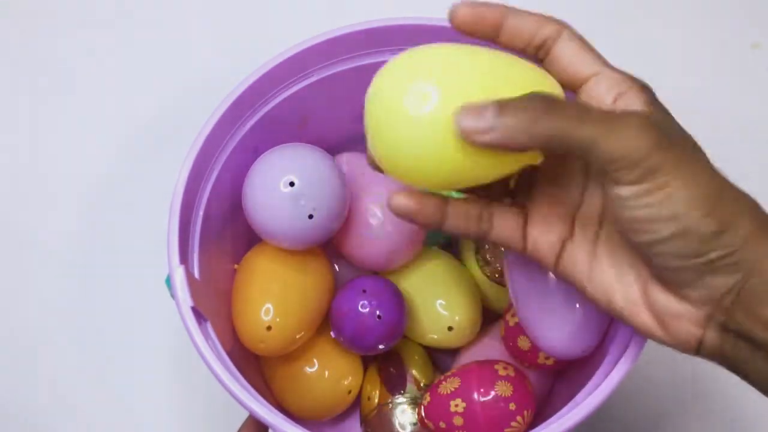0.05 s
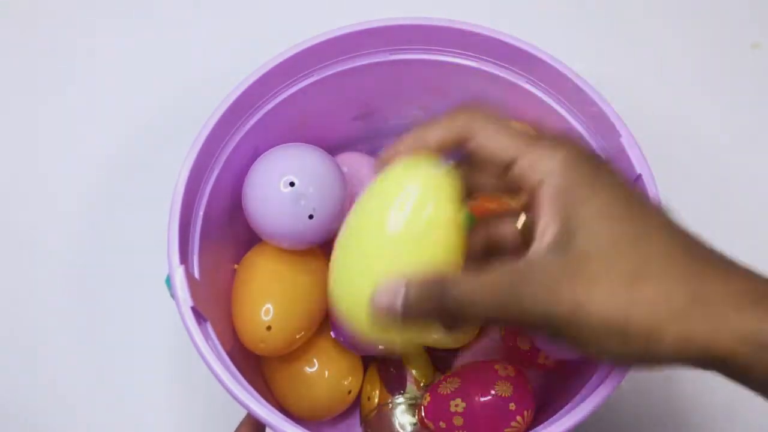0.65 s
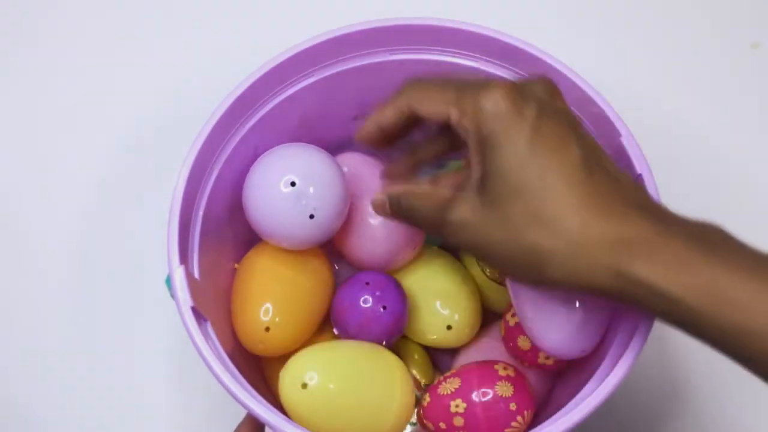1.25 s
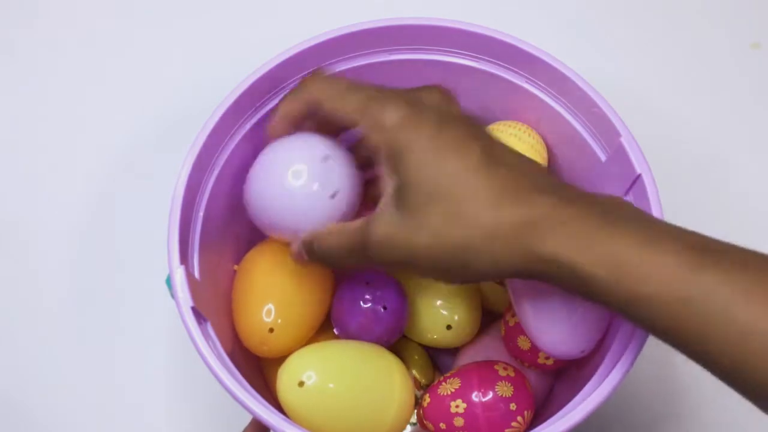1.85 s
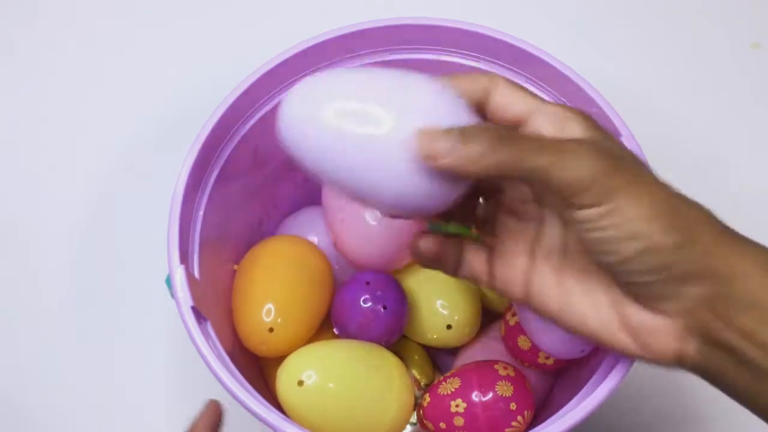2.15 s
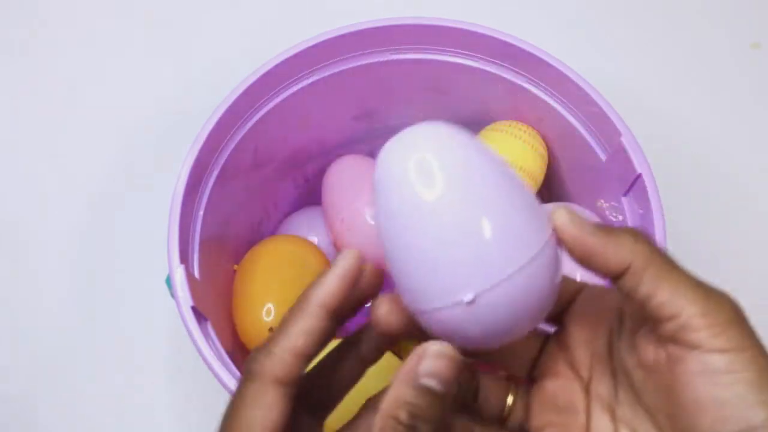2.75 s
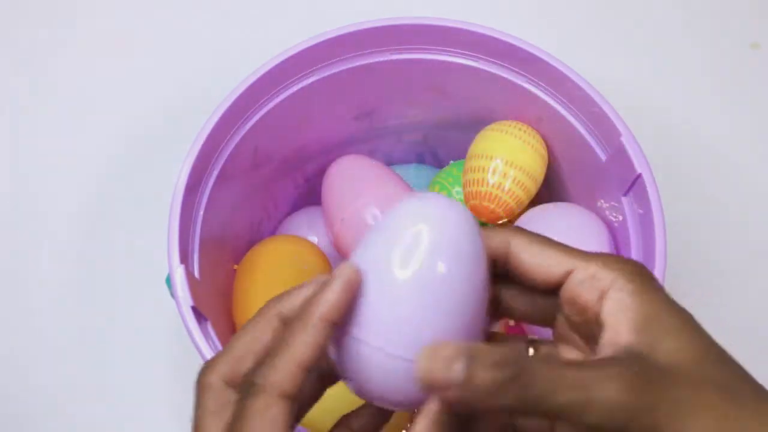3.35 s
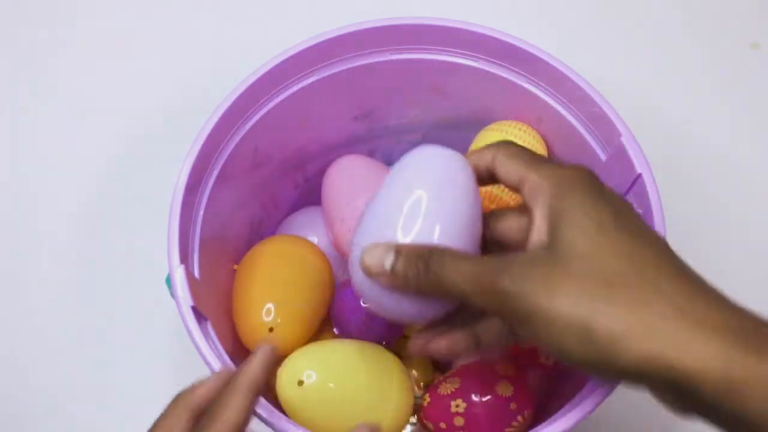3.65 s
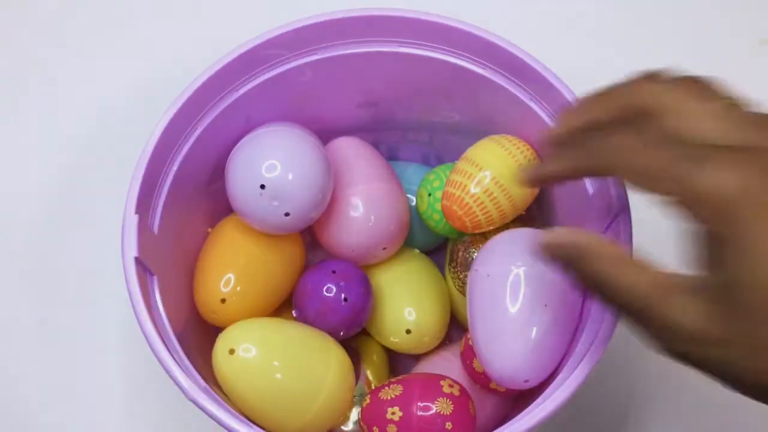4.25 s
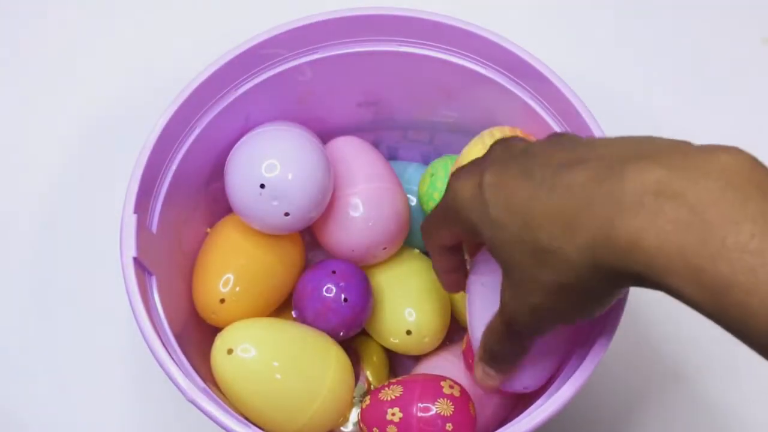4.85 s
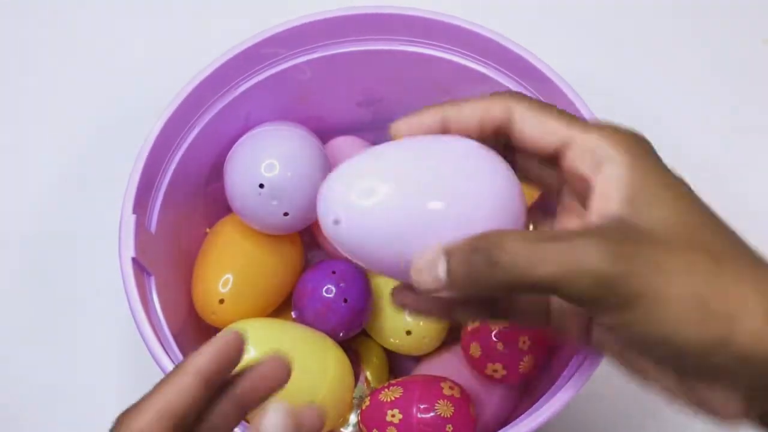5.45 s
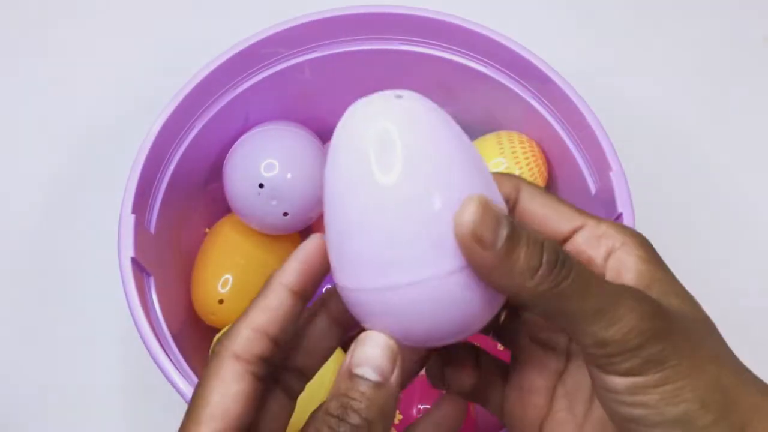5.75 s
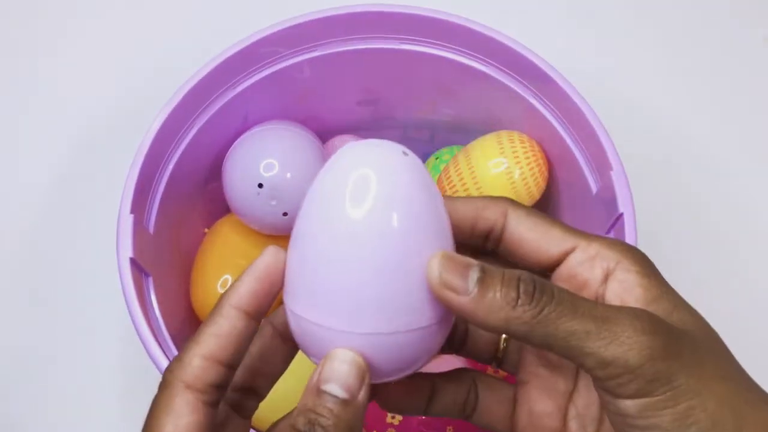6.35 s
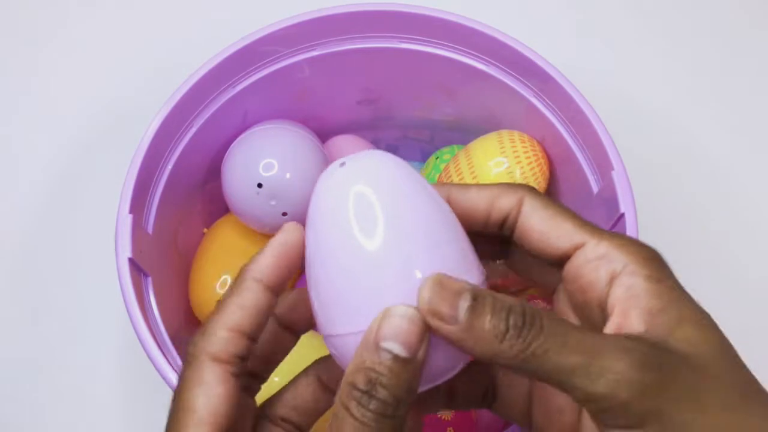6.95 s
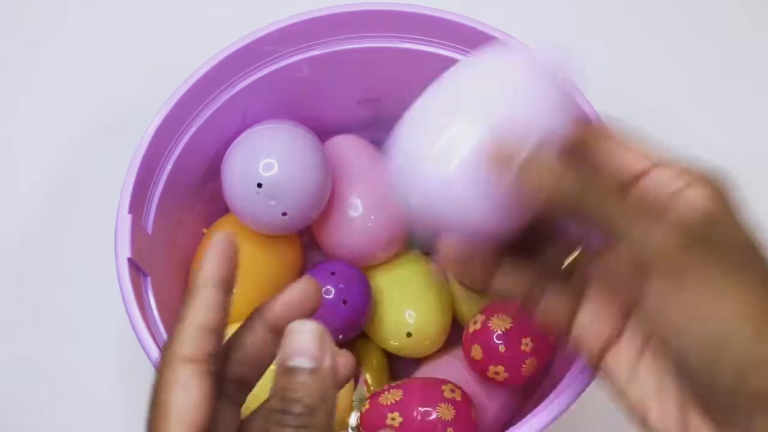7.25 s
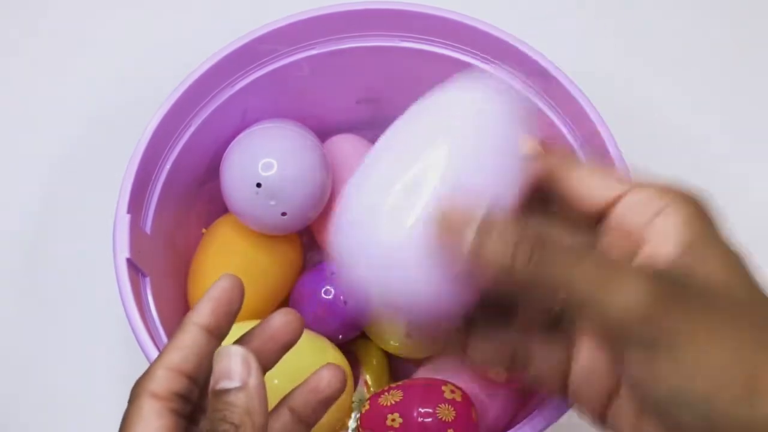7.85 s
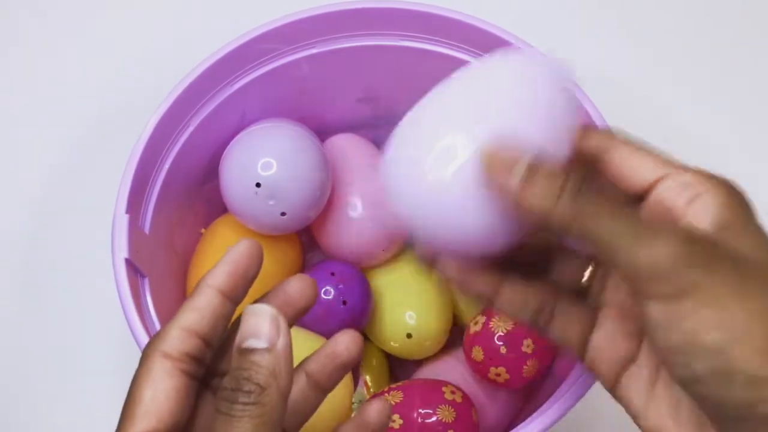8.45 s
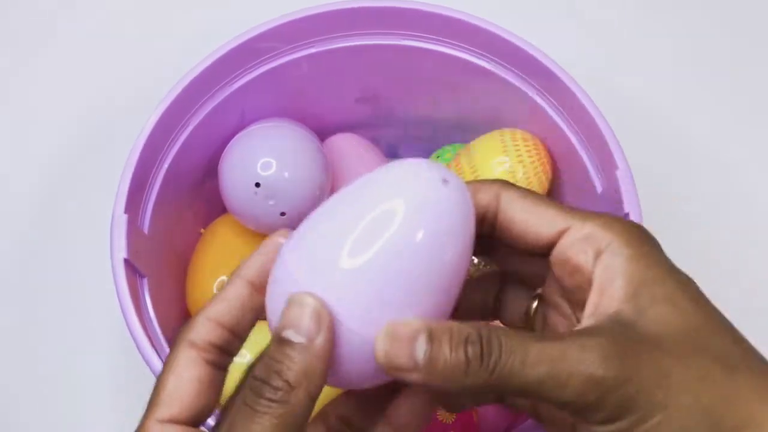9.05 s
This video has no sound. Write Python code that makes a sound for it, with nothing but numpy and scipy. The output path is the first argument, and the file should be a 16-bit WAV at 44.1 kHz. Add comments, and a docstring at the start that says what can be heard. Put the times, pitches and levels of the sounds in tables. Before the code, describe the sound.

In a quiet room, close to the microphone, hands handle filled plastic eggs. First one egg clicks as its hard filling shifts, then it knocks against others in a plastic bucket. After faint finger taps, the eggs bump and scrape again over a low, hollow boom from the bucket. A few more clicks and soft rubbing lead to the loudest part: an egg shaken vigorously, rattling brightly until the end.

```python
"""Hands play with filled plastic eggs from a plastic bucket in a quiet room.
First a yellow egg is turned over: small hard pieces slide and click inside its thin shell.
Then eggs knock together and set the bucket booming, while fingers tap and rub the plastic.
Next a lilac egg is turned and stroked. From about 7.3 s it is shaken hard, so close to the
microphone that the sharpest clicks just overload it."""
import sys
import numpy as np
from scipy import signal
from scipy.fft import rfft, irfft
from scipy.io import wavfile
from scipy.ndimage import uniform_filter1d

SR = 44100
rng = np.random.default_rng(int(sys.argv[2]) if len(sys.argv) > 2 else 0)


def put_to_file(sound):
    """Save the sound as 16-bit audio at rate SR, in the file named by the first command-line argument."""
    columns = np.atleast_2d(sound).T  # one column per channel
    safe = np.clip(columns, -1, 1)
    whole_steps = np.round(safe * 32767)
    wavfile.write(sys.argv[1], SR, whole_steps.astype(np.int16))


N = 400848
SIZE, TOP_HZ = 4096, 16200  # samples in one short sound; upper limit of the treble

# Tone colour of hard contacts, then of rubbing. Each row: frequency in Hz, level in dB.
CONTACT_COLOUR = [(30, -45.5), (130, -20.5), (320, -3), (480, -12), (750, -2), (1700, -0.5), (2450, -2),
                  (3350, -1.5), (4200, -4.5), (5400, -3), (7000, -2.5), (9500, 1), (12300, 7), (14000, 1.5),
                  (16000, -16)]
RUB_COLOUR = [(30, -30), (180, -14.5), (320, -3.5), (480, -2.5), (780, 5), (1700, 3.5), (2800, -3.5),
              (3500, -0.5), (4200, 0.5), (4900, -3.5), (7500, -3), (12200, 4), (14000, 1.5), (16000, -9)]
# Notes the lilac shell rings at. Each row: pitch in Hz, level in dB, fade time in seconds.
LILAC_MODES = [(759, 9.5, 0.013), (1137, 9.5, 0.007), (1654, 3.5, 0.042), (2280, -7.5, 0.051),
               (2523, 5.5, 0.024), (3190, 3.5, 0.059), (3590, 4.5, 0.015), (5190, -11, 0.065),
               (7550, -21, 0.044), (9380, 6.5, 0.019), (11700, -15, 0.017), (12100, 9.5, 0.0087)]
# Eggs knocking together. Each row: start in seconds, then level, brightness, shell ring,
# boom of the bucket's base and boom of its wall, all in dB.
EGG_KNOCKS = [(0.9606, -37, 3, -3.5, -39, -45.5), (0.9844, -27, 1.5, -2.5, -36, -36.5),
              (1.112, -48.5, 26, 15, -73, -67), (1.179, -31.5, 3, -2.5, -40, -53),
              (1.195, -35.5, 14, 4, -69, -58), (1.222, -43, 0, 5, -70, -52), (1.2498, -33, 3, 3, -62, -55),
              (1.2536, -28, -3, -3, -27, -39.5), (1.3052, -29, 13, 8, -42.5, -49),
              (1.3425, -30.5, 19.5, 7.5, -64, -72), (1.544, -56, 19, -5, -49, -60.5),
              (1.582, -48.5, -2, 7, -47, -71), (1.6224, -42, -6, 11.5, -75, -55),
              (1.6678, -51.5, -14, 11, -77, -62), (1.7136, -48, 11, -4, -66, -76),
              (1.8166, -45.5, -1, 4, -41, -53.5), (1.9, -58, -10, -1, -78, -78),
              (3.8349, -37.5, 5, 1, -40, -49), (3.9178, -25.5, 7, -4, -25.5, -40),
              (3.925, -30.5, 0, 4, -61, -49), (3.9505, -32.5, 2, 2, -46, -37.5),
              (4.0265, -27.5, 4, -2.5, -32, -38), (4.0563, -30.5, 8, 4.5, -42, -41),
              (4.5032, -30, 0, -5, -51, -34), (4.6009, -42.5, -1, 2, -71, -54),
              (4.771, -29, 6, -3, -35, -39), (4.88, -37.5, 0, -10, -50, -41),
              (4.9207, -38.5, 11, -2, -45, -58), (4.993, -40, 2, 5, -43, -41.5),
              (5.0796, -38.5, 3, 3, -45, -49), (5.1218, -37, 5, 3, -68, -55),
              (5.1947, -39.5, 19, -6, -70, -58)]
# Eggs scraping or their filling rolling, then the swings of the shaken egg.
# Each row: start and length in seconds, level and brightness in dB.
EGG_SCRAPES = [(.055, 0.063, -52.5, 4), (.13, .18, -54, 9), (.355, 0.025, -41, 2), (.405, 0.058, -41, 28),
               (.47, 0.2, -53, 8), (.575, 0.041, -43, 21), (.66, 0.21, -60.5, 10), (.86, 0.11, -60.5, 12),
               (.99, 0.062, -48, -9), (1.11, 0.08, -54, 6), (1.26, .09, -62, 3), (1.57, 0.083, -58.5, -4),
               (2.0, 0.074, -64, 0), (2.065, 0.06, -54.5, 7), (2.11, 0.033, -49.5, 5),
               (3.475, 0.03, -61, 12), (3.77, 0.27, -63, 5), (3.9, 0.045, -46, -6), (4.51, 0.044, -40, 0),
               (4.6, 0.36, -50.5, 1), (4.745, 0.097, -47, -10), (4.84, 0.13, -43.5, -8.5),
               (5.04, 0.048, -40.5, -6), (6.74, .075, -53, 17), (7.08, 0.041, -60.5, 13)]
SHAKES = [(7.315, .03, -31, 6), (7.345, 0.036, -22.5, 10), (7.38, 0.031, -26.5, 20),
          (7.466, 0.051, -18, 13.5), (7.571, 0.028, -23.5, 3), (7.7, .035, -27, 22), (7.822, .04, -22.5, 0),
          (7.91, 0.066, -20.5, 8), (8.025, 0.04, -33, 7), (8.055, 0.031, -20.5, 16),
          (8.171, 0.037, -24.5, 2), (8.283, 0.038, -28, 2), (8.425, 0.064, -31.5, 0),
          (8.523, 0.019, -27, 6), (8.608, 0.058, -28.5, 1), (8.713, .06, -28, 10), (8.822, 0.062, -33, -5),
          (8.886, 0.044, -33.5, 13), (8.963, 0.089, -33.5, 1)]


def undb(db):
    """Turn decibels into a gain."""
    return 10 ** (np.asarray(db) / 20)


def unit(x):
    """Scale a sound to an average (rms) strength of 1."""
    return x / np.sqrt(np.mean(x ** 2))


def fade(t, t60):
    """Die away by 60 dB every t60 seconds."""
    return np.exp(-np.log(1000) * t / t60)


def add(out, start, sound):
    """Mix a sound in at a start time in seconds."""
    i = max(int(round(start * SR)), 0)
    out[i:i + len(sound)] += sound[:max(N - i, 0)]


def colour(points, size):
    """Draw a gain curve over frequency through (Hz, dB) points."""
    hz, db = np.transpose(points)
    return undb(np.interp(np.log(np.arange(size // 2 + 1) * SR / size + 1), np.log(hz), db))


def causal(gain):
    """Turn a gain curve into a filter that makes no sound before the blow (minimum phase)."""
    cepstrum = irfft(np.log(gain))
    half = len(cepstrum) // 2
    return np.exp(rfft(np.r_[cepstrum[0], 2 * cepstrum[1:half]], 2 * half))


def band(x, low_hz, high_hz):
    """Keep what lies between two frequencies."""
    return signal.sosfilt(signal.butter(4, [low_hz, high_hz], "band", fs=SR, output="sos"), x)


def ring(modes, t, scatter_db, detune, blur_hz):
    """Fading notes (modes): the spot hit favours some, the grip shifts them, loose parts blur them."""
    hz, db, t60 = np.transpose(modes)[:, :, None]
    strength, shift = rng.standard_normal((2, len(modes), 1))
    drift = np.sqrt(2 * np.pi * blur_hz / SR) * np.cumsum(rng.standard_normal((len(modes), len(t))), 1)
    phase = 2 * np.pi * hz * (1 + detune * shift) * t + drift
    return np.sum(undb(db + scatter_db * strength) * np.sin(phase) * fade(t, t60), axis=0)


def band_levels(level, bright, ringing, count):
    """Share a level among bands: brightness favours the high ones, ringing lifts the second highest."""
    db = np.linspace(0, bright, count) + ringing * (np.arange(count) == count - 2)
    return level + db - 10 * np.log10(np.sum(undb(db) ** 2))


def shape_blow(blow, levels_db, edges, span_s):
    """Hardness and place of contact set how loud each band is in a blow's first span_s seconds."""
    hz = np.arange(SIZE // 2 + 1) * SR / SIZE
    centres = np.sqrt(np.multiply(edges[:-1], edges[1:]))
    spectrum = rfft(blow, SIZE) * causal(colour(CONTACT_COLOUR, SIZE))
    n = int(span_s * SR)
    for _ in range(2):
        power = 2 * np.abs(rfft(irfft(spectrum)[:n], SIZE)) ** 2 / (SIZE * n)
        own_db = 10 * np.log10([power[(hz >= lo) & (hz < hi)].sum() for lo, hi in zip(edges, edges[1:])])
        spectrum = spectrum * causal(colour(np.c_[centres, levels_db - own_db], SIZE))
    return irfft(spectrum)


def push(start, length, attack_s, release_t60):
    """Strength of one hand movement: it builds up, holds and dies away."""
    out = np.zeros(N)
    t = np.arange(int((attack_s + length + release_t60) * SR)) / SR - attack_s
    rise = np.clip(t / attack_s / 2 + .5, 0, 1) ** 3
    add(out, start - attack_s, rise * fade(np.maximum(t - length, 0), release_t60))
    return out


def slips(per_second, spread_db):
    """Surfaces stick, then let go in tiny jerks of random time and size."""
    size = undb(spread_db * np.minimum(rng.exponential(size=N), 4))
    return (rng.random(N) < per_second / SR) * rng.choice([-1, 1], N) * size


def chatter(t, t60, spread_db):
    """A quick run of uneven contacts that dies away."""
    contacts = (rng.random(len(t)) < .1) * rng.standard_normal(len(t))
    return contacts * undb(spread_db * rng.standard_normal(len(t))) * fade(t, t60)


def room_tone():
    """The room's low steady rumble, with a faint hiss."""
    # Tone colour of the quiet room. Each row: frequency in Hz, level in dB.
    rumble_colour = [(20, -22.5), (60, 0.5), (130, -2), (300, -4), (600, -17.5), (1200, -21.5), (2500, -25),
                     (5000, -27.5), (11000, -28.5), (16000, -38)]
    return undb(-63.5) * unit(irfft(rfft(rng.standard_normal(N)) * colour(rumble_colour, N), N))


def room_echo(x, tail_db=-15.5, early_db=-16.5):
    """Add quick echoes from bucket and table, then the short tail of a furnished room."""
    t = np.arange(SR // 2) / SR
    mid = band(rng.standard_normal(len(t)), 228, 7500) * fade(t, t60=.25)
    treble = band(rng.standard_normal(len(t)), 6300, TOP_HZ) * fade(t, t60=.3)
    tail = (mid + undb(-4.5) * treble) * (t > .005)
    early = band(rng.standard_normal(len(t)), 360, TOP_HZ) * fade(t, t60=.013) * (t > .002)
    response = (undb(tail_db) * unit(tail) + undb(early_db) * unit(early)) / np.sqrt(len(t))
    return x + signal.fftconvolve(x, response)[:N]


def drone(modes, t, rise_s):
    """Sticking and slipping keeps the bucket's notes sounding at an even strength."""
    jerks = slips(per_second=1500, spread_db=1)
    response = ring(modes, t, scatter_db=0, detune=0, blur_hz=0) * (1 - np.exp(-t / rise_s))
    sound = signal.fftconvolve(jerks, response)[:N]
    return unit(sound / np.sqrt(uniform_filter1d(sound ** 2, size=SIZE) + 1e-12))


def bucket(base_db=-6.5, wall_db=5, drag_db=1, rise_s=.0083, attack_s=.019, release_t60=.33):
    """The bucket booms under each knock, and drones as it rocks or as eggs drag over it."""
    # Notes of the rocking bucket, its base and its wall.
    # Each row: pitch in Hz, level in dB, fade time in seconds.
    rock_modes = [(60, 1, 0.4), (82, 0, 0.81)]
    base_modes = [(61.5, -4, 0.22), (136.6, 10.5, 0.31), (164, -0.5, 0.39)]
    wall_modes = [(250, -1.5, 0.09), (308, -4.5, 0.14), (319.7, 3.5, 0.096), (439, -7.5, 0.055)]
    # The pile of eggs dragging. Each row: start and length in seconds, base and wall levels in dB.
    drags = [(4.487, 0.054, -44.5, -63), (4.777, 0.22, -43, -44.5), (5.032, 0.052, -56, -55.5),
             (5.166, 0.35, -68, -60), (5.73, 0.23, -62.5, -61.5), (6.198, 0.58, -69.5, -67)]
    # The bucket rocking on the table. Each row: start and length in seconds, level in dB.
    rocks = [(4.49, 0.092, -51), (4.79, 0.32, -56.5), (5.783, .15, -47), (6.2, 1.1, -68)]
    out, t = np.zeros(N), np.arange(SR // 2) / SR
    swell = 1 - np.exp(-(t / rise_s) ** 2)
    for start, *_, base, wall in EGG_KNOCKS:
        for modes, db in (base_modes, base + base_db), (wall_modes, wall + wall_db):
            boom = ring(modes, t, scatter_db=2, detune=.015, blur_hz=0) * swell
            add(out, start, undb(db) * boom / np.std(boom[:int(.03 * SR)]))
    rocking, base_drone, wall_drone = (drone(m, t, rise_s) for m in (rock_modes, base_modes, wall_modes))
    for start, length, base, wall in drags:
        dragging = undb(base + drag_db) * base_drone + undb(wall + drag_db) * wall_drone
        out += push(start, length, attack_s, release_t60) * dragging
    for start, length, level in rocks:
        out += push(start, length, attack_s, release_t60) * undb(level + drag_db) * rocking
    return band(out, 37, 490)


def friction(moves, tone_colour, level_db, ring_db, attack_s, release_t60, sing_hz, sing_width_hz,
             sing_db, slips_per_s, spread_db, flutter_db, flutter_per_s, smear_db, smear_t60):
    """Rubbing: tiny slips come in uneven spurts, and each briefly rings a different spot of shell."""
    # Borders of the low, middle and high bands in Hz.
    edges = [250, 2500, 7000, 16000]
    t, time = np.arange(SIZE) / SR, np.arange(N) / SR
    spurts = np.interp(time * flutter_per_s, np.arange(SIZE), rng.standard_normal(SIZE))
    jerks = slips(slips_per_s, spread_db) * undb(flutter_db * spurts)
    energy = np.abs(signal.fftconvolve(jerks ** 2, fade(t, smear_t60) ** 2)[:N])
    smear = np.sqrt(energy) * rng.standard_normal(N)  # a short noisy ring after each slip
    hz = np.arange(N // 2 + 1) * SR / N
    sing = 1 + undb(sing_db) / (1 + 2j * (hz - sing_hz) / sing_width_hz)  # the shell's strongest note
    spectrum = rfft(jerks + undb(smear_db) * smear) * colour(tone_colour, N) * sing
    below = [1 / (1 + (hz / edge) ** 6) for edge in edges]
    bands = np.array([unit(irfft(spectrum * share, N)) for share in np.diff(below, axis=0)])
    out = np.zeros(N)
    for start, length, level, bright in moves:
        gains = undb(band_levels(level + level_db, bright, ring_db, count=3))
        out += push(start, length, attack_s, release_t60) * (gains @ bands)
    return out


def finger_strokes():
    """Skin rubs softly over a shell."""
    # Finger strokes. Each row: start and length in seconds, level and brightness in dB.
    strokes = [(2.99, 0.046, -65, 17), (3.11, 0.1, -65, 12), (3.37, 0.065, -67, 10), (3.63, .035, -71, 2),
               (4.12, 0.32, -64.5, -3), (4.95, .1, -44.5, -2.5), (5.08, 0.095, -41.5, 3.5),
               (5.19, 0.059, -51, -1), (5.255, 0.048, -42.5, -3), (5.33, 0.28, -50.5, -3.5),
               (5.47, 0.31, -48, -1), (5.78, 0.08, -46.5, -5), (5.9, 0.12, -61, -6), (6.03, 0.16, -62, 3),
               (6.39, 0.07, -48.5, -8), (6.475, 0.066, -50.5, -0.5), (6.585, 0.11, -48, -2.5),
               (6.73, 0.093, -56.5, 21), (6.83, 0.19, -67, -3), (7.0, .05, -63, -7), (7.06, 0.058, -55, 13),
               (7.125, 0.017, -53, -23), (7.18, 0.04, -50.5, -4), (7.27, .05, -51.5, -2)]
    return friction(strokes, RUB_COLOUR, level_db=-1, ring_db=-7.5, attack_s=.022, release_t60=.18,
                    sing_hz=3260, sing_width_hz=140, sing_db=-2, slips_per_s=5700, spread_db=1.5,
                    flutter_db=3.85, flutter_per_s=81, smear_db=-15.5, smear_t60=.0041)


def finger_taps(level_db=-.5, ring_db=-37):
    """A fingertip lands, skids for a moment and muffles the shell."""
    # Finger landings. Each row: start in seconds, then level, brightness and shell ring in dB.
    taps = [(2.145, -41, 12.5, -4), (2.234, -59, 1, -5), (2.298, -49.5, -4, 3), (2.775, -42, -12.5, -7),
            (2.815, -53.5, 29, 12), (3.138, -60, 33, 1), (3.2207, -63, 6, 22), (3.6539, -41, 12, -2),
            (6.903, -46.5, 29, 0.5)]
    # Borders of the four bands in Hz.
    edges = [170, 500, 2500, 7000, 16000]
    out, t = np.zeros(N), np.arange(SIZE) / SR
    for start, level, bright, ringing in taps:
        notes = ring(LILAC_MODES, t, scatter_db=3, detune=.03, blur_hz=90) * fade(t, t60=.03)
        shell = (t == 0) + undb(ring_db) * notes
        touch = signal.fftconvolve(chatter(t, t60=.049, spread_db=2.5), shell)[:SIZE]
        levels = band_levels(level + level_db, bright, ringing, count=4)
        add(out, start, shape_blow(touch, levels, edges, span_s=.015))
    return out


def shell_squeaks(level_db=4.5, waver=.04):
    """A glancing touch makes one note of a shell sing briefly, with an unsteady pitch."""
    # Squeaks and pops. Each row: start in seconds, pitch in Hz, level in dB, swell time in seconds.
    squeaks = [(.101, 5980, -45.5, 0.0017), (0.292, 5870, -36.5, 0.0017), (1.1795, 784, -23.5, 0.0024),
               (2.115, 4980, -53, 0.014), (2.301, 11700, -44.5, 0.0038), (3.834, 876, -36.5, .0017),
               (4.548, 4140, -47, .005), (4.606, 4100, -45, 0.0037), (4.6919, 4170, -25, 0.0015),
               (4.859, 4300, -44.5, .0047), (4.92, 4020, -42, 0.0033), (5.079, 4120, -39, 0.0024),
               (5.602, 5300, -31.5, 0.00097), (5.74, 3980, -26.5, 0.0015), (7.846, 3230, -25, 0.0042),
               (8.061, 3190, -30, 0.012), (8.438, 3200, -26.5, 0.0072), (8.669, 3800, -20, .001),
               (8.956, 3980, -28.5, 0.00092)]
    out, t = np.zeros(N), np.arange(SIZE) / SR
    for start, hz, db, swell in squeaks:
        pitch = hz * (1 + waver * unit(uniform_filter1d(rng.standard_normal(SIZE), size=30)))
        strength = undb(db + level_db) * t / swell * np.exp(1 - t / swell)
        add(out, start, strength * np.sin(2 * np.pi * np.cumsum(pitch) / SR))
    return out


def egg_scrapes():
    """An egg scrapes on other eggs, or its filling rolls over inside."""
    return friction(EGG_SCRAPES, RUB_COLOUR, level_db=-1, ring_db=1, attack_s=.026, release_t60=.11,
                    sing_hz=3920, sing_width_hz=750, sing_db=5.5, slips_per_s=5700, spread_db=5,
                    flutter_db=2.5, flutter_per_s=81, smear_db=-11.5, smear_t60=.0088)


def egg_knocks(level_db=-1.5, first_db=7.5, jostle_db=-12, ring_db=-37):
    """An egg lands on others: the shells ring while they and their fillings jostle to rest."""
    # Notes of the piled eggs. Each row: pitch in Hz, level in dB, fade time in seconds.
    pile_modes = [(780, -22, 0.056), (800, -12, 0.075), (1150, -5.5, 0.044), (1513, -5, 0.095),
                  (1940, 8.5, 0.013), (2470, -14, .03), (3270, -2, 0.053), (4080, -2.5, 0.049),
                  (6300, 5, 0.014), (12300, -20, 0.019)]
    # Borders of the four bands in Hz.
    edges = [500, 1100, 2500, 7000, 16000]
    out, t = np.zeros(N), np.arange(SIZE) / SR
    for start, level, bright, ringing, _, _ in EGG_KNOCKS:
        landing = undb(first_db) * (t == 0) + chatter(t, t60=.035, spread_db=2.2)
        jostle = undb(jostle_db) * chatter(t, t60=.11, spread_db=6.4)
        shells = (t == 0) + undb(ring_db) * ring(pile_modes, t, scatter_db=3, detune=.04, blur_hz=70)
        knock = signal.fftconvolve(landing + jostle, shells)[:SIZE]
        levels = band_levels(level + level_db, bright, ringing, count=4)
        add(out, start, shape_blow(knock, levels, edges, span_s=.015))
    return out


def sliding_filling():
    """Each shake sends the filling sliding along the shell."""
    return friction(SHAKES, CONTACT_COLOUR, level_db=-7, ring_db=-4.5, attack_s=.013, release_t60=.14,
                    sing_hz=3250, sing_width_hz=350, sing_db=2, slips_per_s=1200, spread_db=-4.5,
                    flutter_db=5, flutter_per_s=280, smear_db=12, smear_t60=.022)


def stray_hits(moves, count, level_db, spread_db, lag_s, bright_db):
    """Small hits scattered at random through each movement, as rows for clicks()."""
    rows = []
    for start, length, level, _ in moves:
        times = start + rng.random(count) * (length + lag_s)
        size, hardness, ringing = rng.standard_normal((3, count))
        rows += zip(times, level + level_db + spread_db * size, bright_db + 6 * hardness, 4 * ringing)
    return rows


def clicks(hits, modes, level_db, flex_hz, flex_t60, flex_db, crack_db, crack_t60,
           buzz_db, buzz_t60, ring_db, bounce_db):
    """A hard piece hits the shell: the wall flexes once, crowded high notes crack, a few ring on."""
    # Borders of the low, middle and high bands in Hz.
    edges = [500, 2500, 7000, 16000]
    out, t = np.zeros(N), np.arange(SIZE) / SR
    spot_hz = np.geomspace(900, TOP_HZ, 16)
    for start, level, bright, ringing in hits:
        pitch = flex_hz * np.exp(.094 * rng.standard_normal())
        flex = undb(flex_db) * np.cos(2 * np.pi * pitch * t) * fade(t, flex_t60)
        decay = undb(crack_db) * fade(t, crack_t60) + undb(buzz_db) * fade(t, buzz_t60)
        # small patches of shell give off mostly treble
        crack = signal.lfilter([1, -1], [1, -.75], rng.standard_normal(SIZE) * decay)
        notes = undb(ring_db) * ring(modes, t, scatter_db=4, detune=.012, blur_hz=50)
        blow = (t == 0) + flex + crack + notes
        lag = int(rng.uniform(.001, .006) * SR)
        blow[lag:] += undb(bounce_db) * rng.random() * blow[:-lag]  # the piece tips and touches again
        # every spot on the shell has its own tone colour
        spot = colour(np.c_[spot_hz, 2.5 * rng.standard_normal(len(spot_hz))], SIZE)
        blow = irfft(rfft(blow) * causal(spot))
        levels = band_levels(level + level_db, bright, ringing, count=3)
        add(out, start, shape_blow(blow, levels, edges, span_s=.005))
    return out


def yellow_egg():
    """Pieces click inside the turning yellow egg; small stray clicks also go with every scrape."""
    # Pieces hitting the shell. Each row: start in seconds, then level, brightness and shell ring in dB.
    hits = [(0.1938, -41.5, 16.5, 8.5), (0.2079, -37, -4, 0), (0.2353, -32, 9.5, 6.5),
            (0.2422, -27, 23, 12), (0.2526, -31, 18.5, 9.5), (0.3656, -20.5, 5, -1),
            (0.3753, -27.5, 20.5, 7), (0.411, -26.5, 6, -2.5), (0.4246, -21.0, 9, 9.5),
            (0.4368, -33.5, 18.5, 14.5), (0.469, -32.5, 7.5, 2), (0.5119, -27.5, 10.5, -1.5),
            (0.5482, -34.5, -8, 11.5), (0.5586, -31.5, 6, -5), (0.5957, -19.5, 8.5, 3.5),
            (0.6262, -32, 0.5, -2.5), (0.6808, -23, 15.5, -1.5), (0.7048, -38, -7.5, 3),
            (0.7333, -32, -12, 11), (0.7454, -24, 11.5, 0.5), (0.8613, -36, 7, 0.5)]
    # Notes of the yellow shell. Each row: pitch in Hz, level in dB, fade time in seconds.
    modes = [(850, -20, 0.017), (1490, -7, 0.01), (3190, -9.5, 0.083), (3540, 2, .035), (4000, -7, 0.1),
             (5950, -12.5, .015), (8500, -11.5, .015), (10800, 3.5, .015)]
    strays = stray_hits(EGG_SCRAPES, count=3, level_db=-8, spread_db=2, lag_s=.0069, bright_db=3)
    return clicks(list(hits) + strays, modes, level_db=-1.5, flex_hz=1400, flex_t60=.0034, flex_db=-23,
                  crack_db=-7, crack_t60=.003, buzz_db=-16, buzz_t60=.058, ring_db=-22.5, bounce_db=-16)


def lilac_egg():
    """Pieces click inside the lilac egg as it is turned over, then rattle as it is shaken hard."""
    # Pieces hitting the shell. Each row: start in seconds, then level, brightness and shell ring in dB.
    hits = [(5.4918, -28.5, -12, 7), (5.5121, -35, -5, 4), (5.5534, -25.5, -8.5, -0.5),
            (5.6009, -20.5, 0.5, -4), (5.6414, -30, -7, -1), (5.666, -31, -7, -3), (5.7033, -34, 0, -7),
            (5.7419, -27.5, 2, 1), (5.7798, -29.5, 7, -2), (5.8003, -31.0, 4, -3), (5.8663, -30, -13, 9),
            (5.8817, -35, 4, -5), (5.9039, -35, -2, 1), (5.9414, -40.5, -7.5, 4), (7.3442, -28, -35, 14.5),
            (7.3643, -26.5, -15, 6), (7.3845, -24.5, 8, -3), (7.4645, -24, 12, 5), (7.4768, -16.5, -11, 6),
            (7.4882, -16, 12, -8), (7.5158, -17, 14, -11), (7.5288, -19.5, -7, 7), (7.5472, -20, 5, 5),
            (7.5797, -12.5, -3.5, 2.5), (7.6046, -17.0, 4, -5.5), (7.6771, -17.5, 0.5, -7.5),
            (7.7001, -16.5, 3, -12), (7.7176, -19, 9, -10), (7.728, -23.5, -2, -17),
            (7.8279, -11, 2.5, 4.5), (7.8385, -20, 9, -10), (7.8446, -12.5, -0.5, -2.5),
            (7.8868, -19, 3, 3), (7.9201, -23.5, -7, 4.5), (7.9374, -19, 8.5, -15), (7.9656, -25, 15, -13),
            (7.9913, -25, 7, 18), (8.0496, -17.5, -8, 5.5), (8.0584, -12.5, 2.5, -2), (8.067, -18, -1, -4),
            (8.0813, -23, -13, 7), (8.1239, -28.0, -5, 1), (8.1557, -29.5, -7, 1), (8.1814, -19.0, 0, -3),
            (8.1983, -21, -0.5, -16), (8.2177, -10, 5.5, -7.5), (8.2904, -20.5, 7, 6),
            (8.3014, -7.5, 2, -4.5), (8.3223, -23.5, 3, -19), (8.3834, -28, -1, 0), (8.3966, -20, -2.5, -5),
            (8.4251, -10.5, 5.5, -5), (8.4398, -9, 14.5, -3.5), (8.4717, -20.5, 4, -10),
            (8.4854, -23.5, -2, -5), (8.5268, -8, 1.5, -5), (8.5484, -18, 4, 2), (8.5876, -18.0, -4, -4),
            (8.6103, -18.5, -5, -17), (8.6259, -20.0, 19, 1), (8.6609, -20.5, 1, -5), (8.7116, -24, 9, 0),
            (8.7226, -12, 0.5, -6), (8.7456, -16.5, -7, 0), (8.7677, -21.5, -9, 10), (8.7775, -24, 9, -1),
            (8.8276, -20, 14, -9), (8.8473, -15.0, 2, -7), (8.8907, -23.5, 4, 6), (8.9093, -19.5, -1.5, -9),
            (8.9478, -25.5, -8, -1.5), (8.9833, -30, -8, 5), (9.0303, -22.5, -1, 1.5),
            (9.0696, -19, -1.5, 0)]
    strays = stray_hits(SHAKES, count=4, level_db=-9, spread_db=-.5, lag_s=.005, bright_db=-4)
    return clicks(list(hits) + strays, LILAC_MODES, level_db=-.5,
                  flex_hz=1710, flex_t60=.0022, flex_db=0, crack_db=-9.5, crack_t60=.0051,
                  buzz_db=-14, buzz_t60=.048, ring_db=-26.5, bounce_db=-14.5)


def scene():
    """Eggs, fingers and bucket together in the room, as one channel."""
    hits = yellow_egg() + lilac_egg() + egg_knocks() + finger_taps()
    rubbing = shell_squeaks() + finger_strokes() + egg_scrapes() + sliding_filling()
    return (room_echo(hits + rubbing + bucket()) + room_tone())[None]


def record(dry):
    """The sharpest clicks are clipped at full scale, then the highest treble is cut steeply."""
    treble_cut = signal.ellip(8, .2, 60, TOP_HZ, fs=SR, output="sos")
    return signal.sosfilt(treble_cut, np.clip(dry, -1, 1))


dry = scene()
out = record(dry)
put_to_file(out)
```